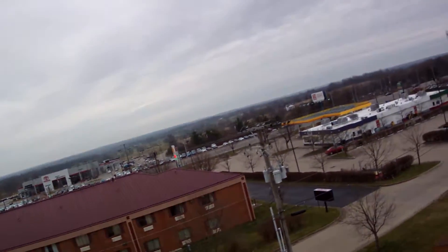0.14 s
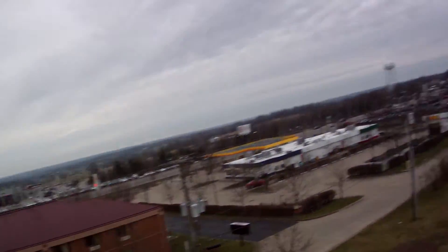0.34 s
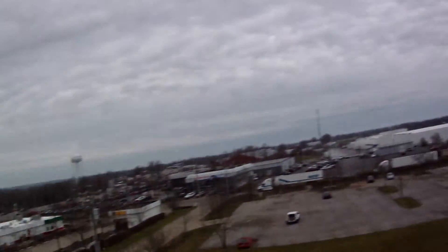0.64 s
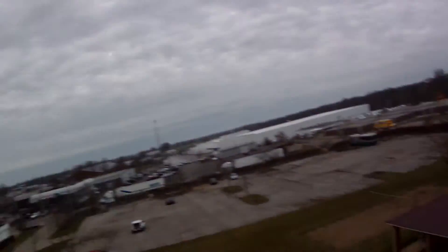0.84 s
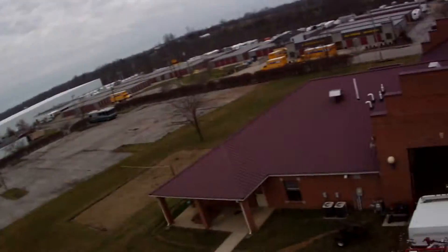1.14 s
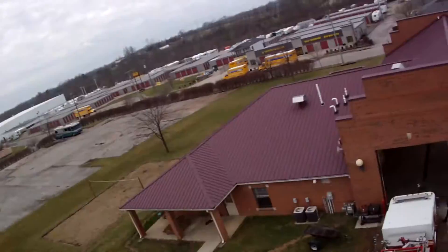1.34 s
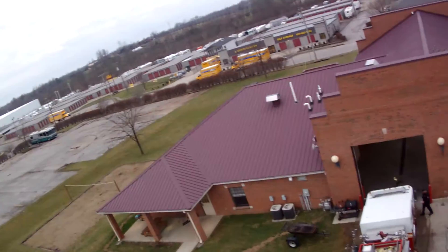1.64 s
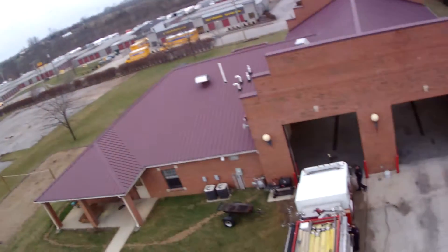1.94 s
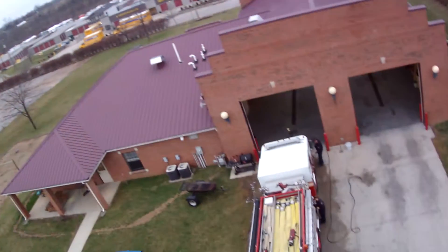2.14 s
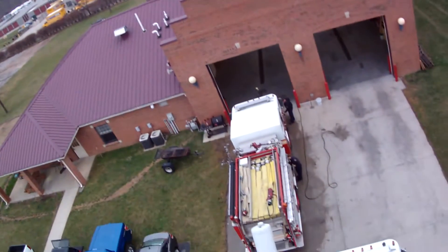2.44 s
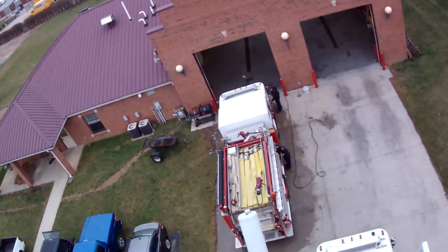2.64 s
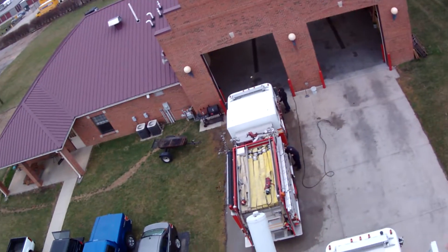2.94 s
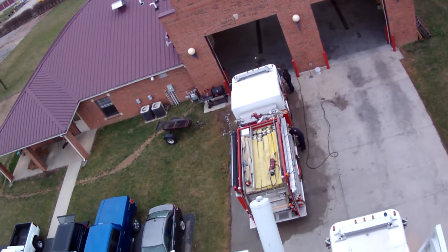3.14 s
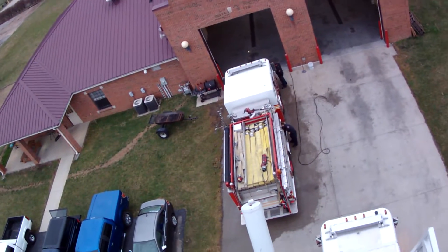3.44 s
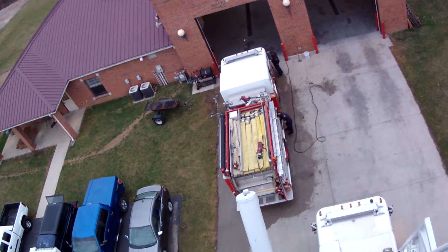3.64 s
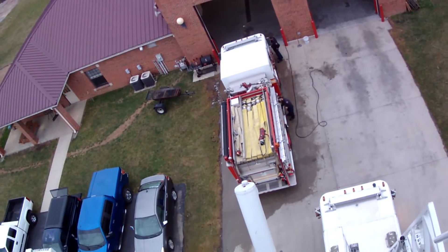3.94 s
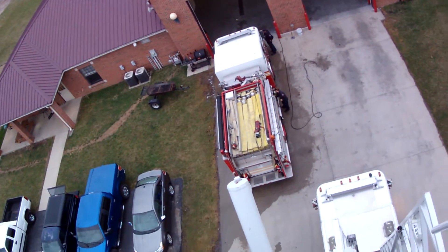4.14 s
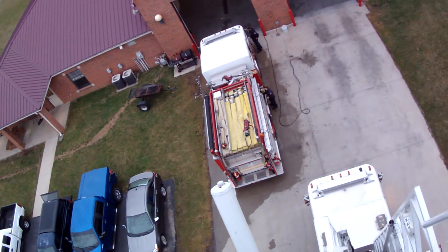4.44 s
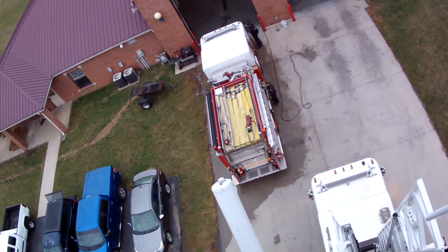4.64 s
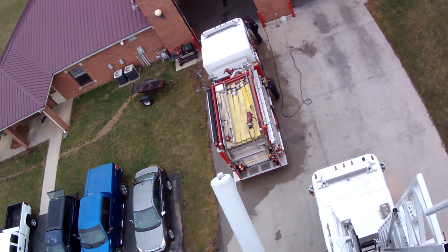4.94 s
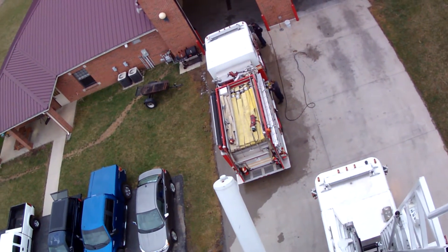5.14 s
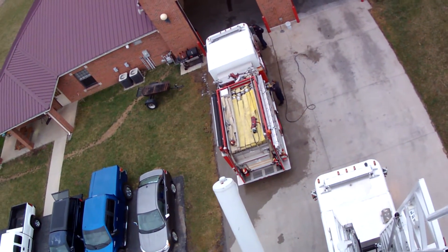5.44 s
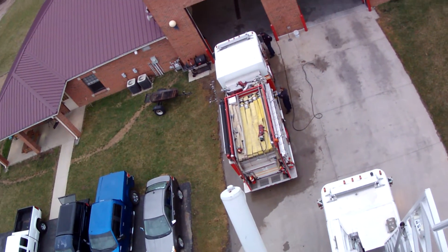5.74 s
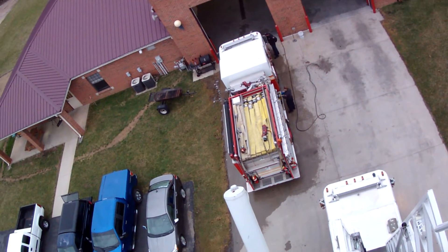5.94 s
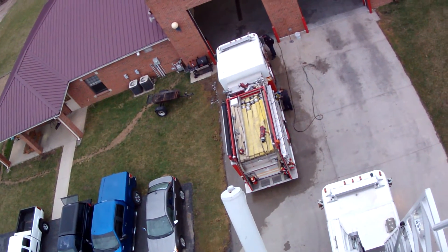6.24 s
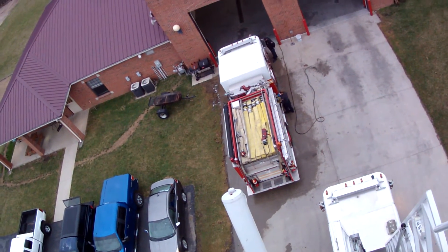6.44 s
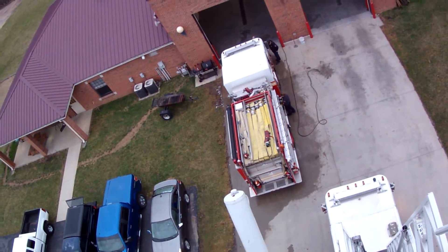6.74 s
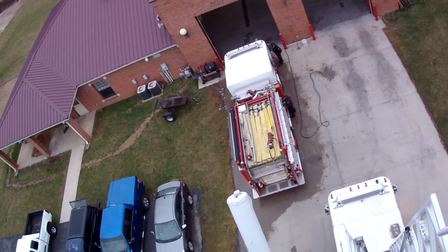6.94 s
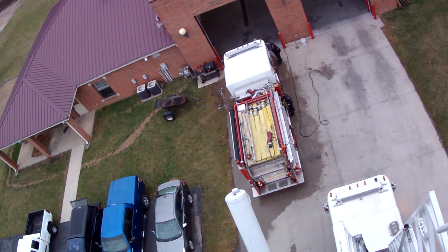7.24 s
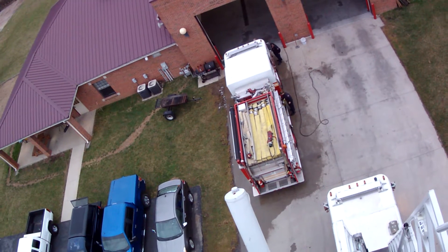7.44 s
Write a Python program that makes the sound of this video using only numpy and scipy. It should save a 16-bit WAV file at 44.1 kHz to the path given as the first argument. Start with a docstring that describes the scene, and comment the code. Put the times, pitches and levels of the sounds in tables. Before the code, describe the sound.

Outdoors on a raised ladder, a microphone picks up a steady low diesel rumble, mechanical clatter and thin pump whine, shifting in balance as it turns. One close click precedes violent, clipping wind buffets with hard thumps. After three seconds the wind clears, leaving the engine, with its pump tone returning, a rising deep hum and faint flickering treble hiss.

```python
"""A ladder truck heard from the top of its raised ladder: a diesel at fast idle as tones and cyclic noise,
its hydraulic pump and whine as tones, all shifting in balance as the listener turns; treble hiss flickers.
A latch clicks (decaying modes), gusts of shaped noise and eddies buffet the microphone until it clips,
and the signal jumps once. Weaker gusts follow, then the low hum, a gliding sine, climbs."""
import sys
import numpy as np
from scipy.fft import rfft, irfft, next_fast_len
from scipy.io import wavfile
from scipy.ndimage import map_coordinates

SR = 44100
rng = np.random.default_rng(int(sys.argv[2]) if len(sys.argv) > 2 else 0)


def to_wav(sig):
    """Store sig (one row per channel, or 1-D mono) as 16-bit WAV at the path in sys.argv[1].

    Samples outside -1..1 are clipped; the rate is SR.
    """
    pcm = np.clip(np.atleast_2d(sig), -1, 1) * 32767
    pcm = np.round(pcm).astype(np.int16)
    wavfile.write(sys.argv[1], SR, pcm.T)  # frames by channels


N = 334719
T = np.arange(N) / SR  # s

SHAFT_HZ, PUMP_HZ = 22.893, 257.5
# exhaust and pump as the listener turns: t/s, firing tone/dB, its octave/dB, pump/dB
DRONE = [(0, -33, -34, -40), (.6, -38, -36, -38), (2, -33, -34, -54), (3.3, -32, -39, -58),
         (4.3, -31, -42, -51.5), (6.2, -30, -44, -47), (7.59, -29.5, -47.5, -44.5)]
# broad engine noise as the listener turns away and back: t/s, clatter/dB, upper clatter/dB
TURN = [(0, -49, -56), (.55, -49, -56), (.65, -53, -60), (1.06, -56, -65), (1.2, -49, -60),
        (1.6, -47.5, -58), (2.2, -49.5, -55), (2.7, -49, -51.5), (3.34, -48, -52), (3.8, -46.5, -51),
        (4.9, -46, -51.5), (5.6, -49, -57), (6.74, -47.5, -54), (7.14, -46, -51), (7.59, -47.5, -54.5)]
# engine treble: t/s, fizz/dB, its narrow band/dB
TREBLE = [(0, -70.5, -77), (.65, -69.5, -73), (.95, -69, -64.5), (1.2, -72, -74.5), (1.6, -75, -82),
          (3, -70.5, -74.5), (4.2, -70, -72), (5.6, -72, -77.5), (7.59, -71, -75)]


def amp(db):
    """Amplitude ratio of a level in dB."""
    return 10 ** (np.asarray(db) / 20)


def unit(x):
    """x at rms 1."""
    return x / np.sqrt(np.mean(x ** 2) + 1e-20)


def curves(rows):
    """One value per sample for each column after the time."""
    s, *cols = np.transpose(rows)
    return [np.interp(T, s, c) for c in cols]


def wobble(rate_hz):
    """A smooth random curve, rate_hz knots a second."""
    return map_coordinates(rng.standard_normal(int(N * rate_hz / SR) + 4), [T * rate_hz])


def filtered(x, response):
    """x times a response of frequency."""
    m = next_fast_len(N + 8192)
    return irfft(rfft(x, m) * response(np.fft.rfftfreq(m, 1 / SR)), m)[:N]


def coloured(x, points):
    """x through (f/Hz, relative level/dB) points on a log axis, silent outside them, at rms 1."""
    f, db = np.transpose(points)
    return unit(filtered(x, lambda hz: amp(np.interp(np.log(hz + 1), np.log(f + 1), db, -150, -150))))


def tone(hz, db, waver_db, drift_rad):
    """A sine whose level and phase wander about the given rms and pitch, as through moving air."""
    phase = 2 * np.pi * (np.cumsum(hz + 0 * T) / SR + rng.random()) + drift_rad * wobble(3)
    return np.sqrt(2) * amp(db + waver_db * wobble(4)) * np.sin(phase)


def cyclic(share):
    """Noise of which a share repeats every two shaft turns, as valves and injectors do."""
    pattern = rng.standard_normal(4096)
    cycle = T * SHAFT_HZ / 2 % 1
    again = map_coordinates(pattern, [cycle * len(pattern)], mode="grid-wrap")
    share = np.clip(share, 0, 1)
    return np.sqrt(share) * unit(again) + np.sqrt(1 - share) * rng.standard_normal(N)


def engine():
    """Four-stroke diesel: firing tones, whole and half shaft orders, cyclic noise; high orders follow clatter."""
    # shaft orders: order, level/dB
    orders = [(4.5, -48.5), (8.0, -51.5), (9.0, -56), (10, -56.5), (11.0, -50), (13.0, -58.5), (15.0, -59),
              (16.5, -61.5), (18, -61.5), (19.5, -59), (23.5, -63), (25.0, -63.5), (25.5, -69),
              (27.0, -61.5), (28.5, -62.5), (29.0, -67.5), (30.5, -69.5), (37.5, -87.5), (53.5, -76),
              (60.0, -78.5), (61.5, -65.5), (62.0, -74), (63.0, -78.5), (66.0, -68.5), (67.0, -71),
              (69.0, -63), (72, -65.5), (72.5, -70.5), (74.5, -66), (76.0, -60.5), (77.0, -64.5),
              (78.0, -79.5), (79.0, -61.0), (82.0, -58.5), (85.0, -72), (91, -63)]
    # noise spectra: f/Hz, relative level/dB
    roar = [(15, -5), (28, -2.5), (60, -7.5), (110, -10.5), (200, -16), (310, -17.5), (500, -18.5),
            (680, -24.5), (850, -29.5), (1050, -43.5), (1300, -53.5)]
    clatter = [(900, -45.5), (1050, -26.5), (1200, -14.5), (1430, -11), (1750, 1.5), (1950, -3),
               (2120, -16), (2350, -39)]
    upper_clatter = [(1850, -26.5), (2050, -2), (2280, 6), (2400, -1), (2660, -7), (3200, -27),
                     (3600, -55.5)]
    fizz = [(1880, -42), (3200, -10), (3670, 7), (4330, 0), (4790, -6.5), (5340, -0.5), (5700, -7.5),
            (7410, -42), (12500, -120)]
    sizzle = [(3350, -47), (5700, -3.5), (6670, 5), (7880, -0.5), (8500, -4), (11000, -50.5), (18700, -120)]
    # airy sizzle that recedes early: t/s, level/dB
    airy = [(0, -69), (.56, -71.5), (.6, -75), (2.5, -78.5), (4, -76), (7.59, -78.5)]
    firing_db, octave_db, _ = curves(DRONE)
    clatter_db, upper_db = curves(TURN)
    fizz_db = curves(TREBLE)[0]
    out = tone(3 * SHAFT_HZ, firing_db, .7, .1) + tone(6 * SHAFT_HZ, octave_db, .8, .15)
    for order, db in orders:
        turn_db = (clatter_db - np.median(clatter_db)) * (order > 45)
        # firing overtones follow the exhaust
        turn_db += (octave_db - np.median(octave_db)) * (round(order / 3, 1) in (5, 6))
        out += tone(round(2 * order) / 2 * SHAFT_HZ, db + turn_db, waver_db=2.0, drift_rad=0.42)
    out += amp(-40 + 0.78 * wobble(7.8)) * coloured(cyclic(0.23), roar)
    out += amp(clatter_db + 0.76 * wobble(5.9)) * coloured(cyclic(.12), clatter)
    out += amp(upper_db + 1.3 * wobble(7)) * coloured(cyclic(0.027), upper_clatter)
    out += amp(fizz_db + 0.88 * wobble(20)) * coloured(cyclic(0.17), fizz)
    return out + amp(curves(airy)[0]) * coloured(rng.standard_normal(N), sizzle)


def ring():
    """Narrow rough band in the fizz: two low noises on quadrature carriers, swelling now and then."""
    centre_hz = 4373
    db = curves(TREBLE)[1] + 1.4 * wobble(2.39)
    sideband = [(1, -3.0), (160, 1), (300, -12.5)]  # offset/Hz, relative level/dB
    a = coloured(rng.standard_normal(N), sideband)
    b = coloured(rng.standard_normal(N), sideband)
    phase = 2 * np.pi * centre_hz * T
    return amp(db + 1.6 * wobble(15)) * (a * np.cos(phase) + b * np.sin(phase))


def hydraulics():
    """Pump piston tone with overtones, and a whine of several tones that follows the upper clatter."""
    # pump overtones: multiple, level/dB
    pistons = [(2, -54), (5, -72.5), (6, -72.5), (10, -73)]
    # whine tones: f/Hz
    whine_hz = [1903, 2176, 2220.5, 2265, 2402.5, 2487, 2547.3, 4441, 4484]
    # their levels before turning: level/dB
    whine_db = [-64, -65, -55, -65, -65.5, -76.5, -66, -82, -98.5]
    upper_db = curves(TURN)[1]
    out = tone(PUMP_HZ, curves(DRONE)[2], waver_db=2.5, drift_rad=0.25)
    for multiple, db in pistons:
        out += tone(round(multiple) * PUMP_HZ, db, waver_db=-1.0, drift_rad=0.77)
    turn_db = 0.76 * (upper_db - np.median(upper_db))
    for hz, db in zip(whine_hz, whine_db):
        out += tone(hz, db + turn_db, waver_db=0.5, drift_rad=0.89)
    return out


def hum():
    """A low unsteady hum that climbs and settles, with a weaker tone above it."""
    # both tables: t/s, f/Hz, level/dB
    low_hum = [(0, 33.1, -34), (1.1, 33, -32.5), (3.2, 32.75, -35), (3.6, 33.3, -29.5), (3.9, 36.35, -34.5),
               (4.35, 37.6, -36.5), (4.55, 40.7, -34), (7.59, 41.2, -30.5)]
    upper_hum = [(0, 114.9, -50.5), (3.6, 113.8, -45), (6, 115.3, -44.5), (6.4, 111.7, -54),
                 (7.59, 109.7, -48)]
    waver_db = 1.5
    return tone(*curves(low_hum), waver_db, drift_rad=0.72) + tone(*curves(upper_hum), waver_db, drift_rad=2.2)


def gusts():
    """Wind strength in dB: each gust rises fast, holds and dies away; powers add to the breeze."""
    # light air under the gusts: t/s, level/dB
    breeze = [(0, -29), (1.1, -35.5), (3.6, -38), (4.1, -42)]
    # gusts: start/s, length/s, level/dB
    gust_rows = [(1.11, 0.16, -18.5), (1.283, 0.62, -15.5), (2.193, 0.42, -14.5), (2.875, 0.089, -29),
                 (3.047, 0.05, -23.5), (3.202, 0.052, -27.5)]
    attack_s, release_db_per_s = 0.052, 47
    power = amp(2 * curves(breeze)[0])
    for s, length_s, db in gust_rows:
        rise = np.clip((T - s) / attack_s, 0, 1) ** 2
        fall_db = release_db_per_s * np.maximum(T - s - length_s, 0)
        power = power + rise * amp(2 * (db - fall_db))
    return 10 * np.log10(power)


def wind():
    """Turbulence on the microphone port: lumpy low noise, upward-peaked flutter and single eddies."""
    # noise spectra: f/Hz, relative level/dB
    buffet = [(12, -9), (25, 6), (45, -7), (80, -6), (130, -16.5), (250, -31)]
    flutter = [(50, -18.5), (110, 4.5), (200, -2), (350, -15), (600, -47), (1000, -48.5)]
    # strongest eddies: t/s, level/dB, rise/ms, fall/ms, push 1 or pull -1
    thumps = [(1.333, -6.5, 1.6, 1.6, 1), (1.3607, -5.5, 1.7, 2.6, 1), (1.5206, -7.5, 2, 1.1, 1),
              (1.5528, -1, 2.6, 2.7, -1), (1.589, -5.5, 3.5, 1.9, -1), (1.704, -3.5, 2.5, 4.4, -1),
              (1.7938, -6, 2.6, 1.6, 1), (1.8185, -3, 4.4, 1.3, 1), (1.827, -5, 4, 5.6, -1),
              (2.251, -5, 4, 2.2, 1), (2.325, -0.5, 0.98, 3, 1), (2.386, -6.5, 1.4, 1.6, 1),
              (2.4062, -6.5, 1.1, 4.6, 1), (2.4289, -0.5, 2.8, 1.12, 1), (2.4701, 0.5, 0.91, 4.9, 1),
              (2.5095, -4.5, 1.3, 3.7, 1), (2.5361, -1.5, 0.95, 0.95, 1), (2.6845, -8.5, 7.4, 1.6, 1),
              (2.882, -7, 1.37, 4.2, -1), (2.94, -11, 3.4, 3.1, -1)]
    flutter_db = -10.5  # over the buffeting
    # smaller eddies: mean gap, mean level over the buffeting, mean rise, fall
    gap_s, eddy_db, rise_ms, fall_ms = .045, 5, 2.3, 3.8
    buffet_db = gusts()
    low = unit(amp(1.6 * wobble(12)) * coloured(rng.standard_normal(N), buffet))
    fast = coloured(rng.standard_normal(N), flutter)
    fast = unit(amp(1.7 * wobble(30)) * (fast + 0.22 * (fast ** 2 - 1)))
    out = amp(buffet_db) * (2.5 * np.tanh(low / 2.5) + amp(flutter_db) * fast)

    chance = rng.random((150, 4))
    times = .1 + np.cumsum(gap_s * (.5 + chance[:, 0]))
    small = []
    for s, (_, size, rise, push) in zip(times, chance):
        if s < T[-1] - .1:
            db = np.interp(s, T, buffet_db) + eddy_db + 6 * (size - .5)
            small.append((s, db, rise_ms * (.5 + rise), fall_ms, push - .25))  # mostly pushes
    for s, db, rise, fall, push in small + thumps:
        near = slice(round((s - .1) * SR), round((s + .1) * SR))
        u = (T[near] - s) * 1000 / np.where(T[near] < s, rise, fall)
        out[near] *= 1 - np.exp(-.15 * u ** 2)  # the eddy takes over from the rest
        swing = 1.195 * np.exp(-.6 * u ** 2) - 0.34 * np.exp(-.06 * u ** 2)  # recoil around it
        out[near] += np.sign(push) * amp(db) * swing
    return out


def clicks():
    """A small metal latch close by, as decaying modes and a noise tick, and faint rough pings."""
    # latch clicks: t/s, level/dB
    latch_clicks = [(1.0886, -29.5)]
    # latch modes: f/Hz, level/dB, t60/s
    latch_modes = [(1905, -2, 0.049), (2090, -8, .02), (3950, -17, .025), (5870, -15, 0.023),
                   (6240, -20, .025), (8775, -23, 0.022), (10600, -16.5, 0.01), (11790, -18, 0.016)]
    # pings: t/s, f/Hz, level/dB
    pings = [(.568, 6050, -56), (.601, 2700, -50), (.602, 3070, -56), (1.03, 5800, -59), (1.781, 3900, -58),
             (2.119, 3800, -57)]
    ping_t60_s, rough_rad = 0.083, .12  # roughness: phase scatter a sample
    out, t = np.zeros(N), T[:SR // 5]
    for s, db in latch_clicks:
        modes = np.zeros(len(t))
        for hz, level_db, t60_s in latch_modes:
            modes += amp(level_db + rng.normal(0, 1.7) - 60 * t / t60_s) * np.sin(2 * np.pi * hz * t)
        modes *= 1 - np.exp(-t / .0006)
        tick = .1 * amp(-60 * t / .03) * rng.standard_normal(len(t))
        out[round(s * SR):][:len(t)] += amp(db) * (modes + tick)
    for s, hz, db in pings:
        envelope = amp(db - 60 * t / ping_t60_s) * (1 - np.exp(-t / 0.0012))
        phase = 2 * np.pi * hz * t + np.cumsum(rng.normal(0, rough_rad, len(t)))
        out[round(s * SR):][:len(t)] += envelope * np.sin(phase)
    return out


def hiss():
    """Steady high hiss, with noise blips of a few ms, singly and in a cluster three times a second."""
    # steady spectrum, used from the third row: f/Hz, relative level/dB
    hiss_points = [(3350, -32), (5700, -2), (5850, -1.5), (6700, -4), (8670, -2), (9680, 3), (10800, -2.5),
                   (13100, 0.5), (15700, -4.5)]
    flicker_s = .334
    cluster = np.cos(2 * np.pi * (T - .25) / flicker_s) > .8
    blips = np.clip(wobble(130) - np.where(cluster, -.3, 1.6), 0, .4)
    steady = coloured(rng.standard_normal(N), [(2500, 0.5), (5000, 3)] + hiss_points[2:])
    blip_points = [(8500, -15.5), (9600, -2.5), (11000, -4.5), (13500, -3), (15700, -1.5)]
    return amp(-72.0) * steady + amp(-65.0) * blips * coloured(rng.standard_normal(N), blip_points)


def scene():
    """Sum of all sources, one channel."""
    return (engine() + ring() + hydraulics() + hum() + wind() + clicks() + hiss())[None]


def record(dry):
    """The level dips briefly as the signal jumps and slides back; the input clips and is band-limited."""
    jump_s, ceiling, top_hz = 1.5623, .71, 15750
    after_s = np.maximum(T - jump_s, 0)
    jump = amp(-9.5) * (T >= jump_s) * np.exp(-after_s / 0.01)
    dip = 1 - 0.27 * np.exp(-((T - jump_s) / 0.002) ** 2)
    x = np.clip(dry[0] * dip + jump, -ceiling, ceiling)
    # response falls from 100 Hz below top_hz to zero 300 Hz above it
    return filtered(x, lambda hz: np.clip((top_hz + 300 - hz) / 400, 0, 1) ** 2)[None]


dry = scene()
out = record(dry)
to_wav(out)
```